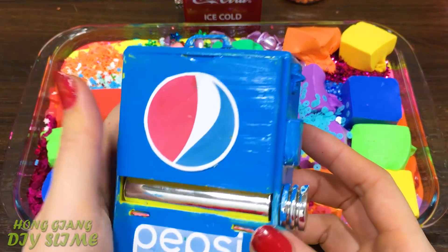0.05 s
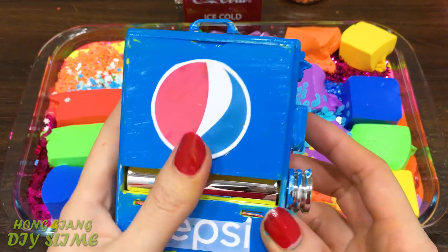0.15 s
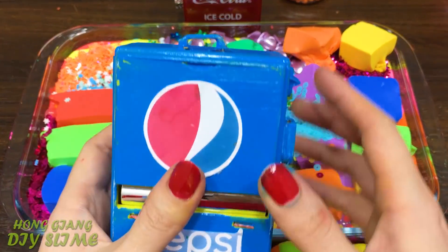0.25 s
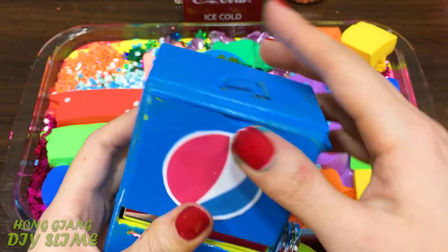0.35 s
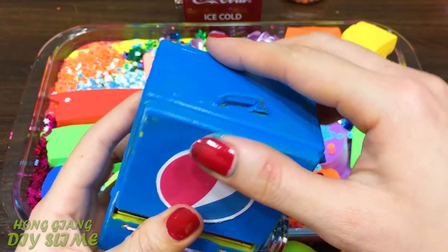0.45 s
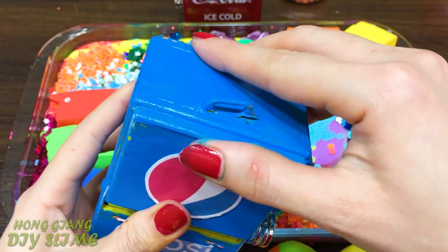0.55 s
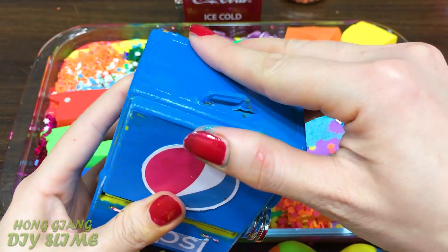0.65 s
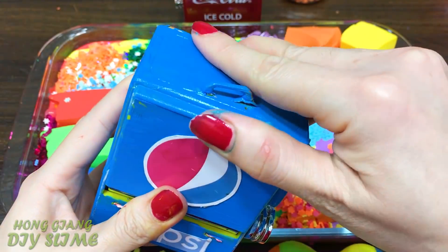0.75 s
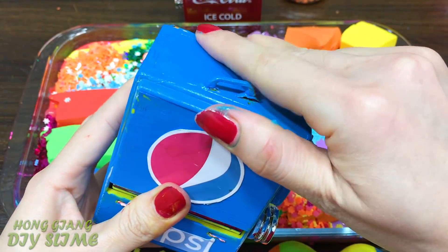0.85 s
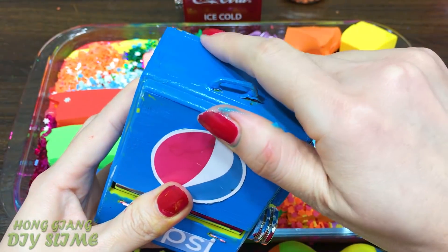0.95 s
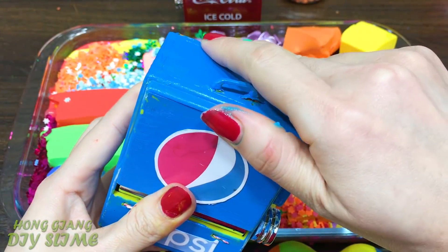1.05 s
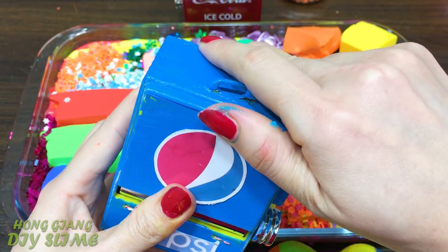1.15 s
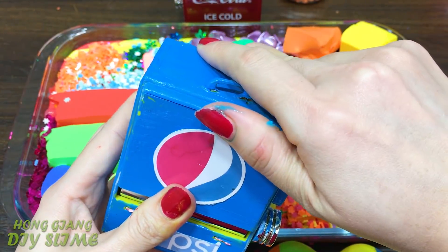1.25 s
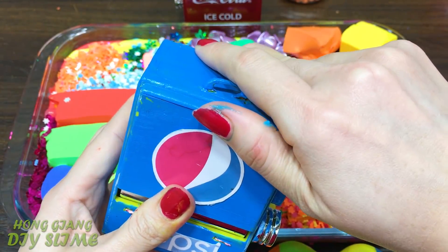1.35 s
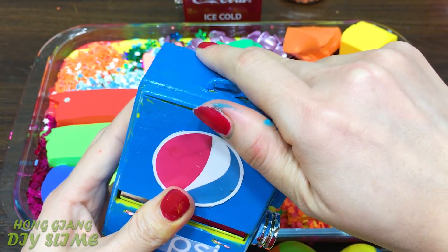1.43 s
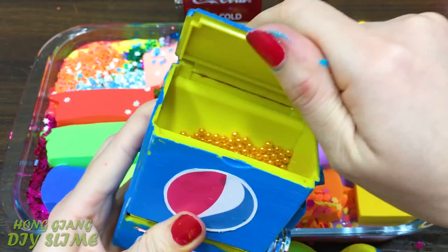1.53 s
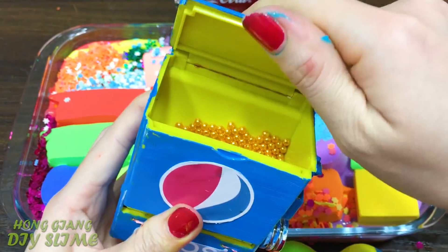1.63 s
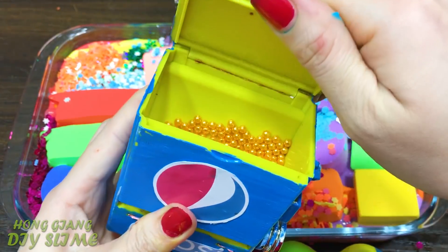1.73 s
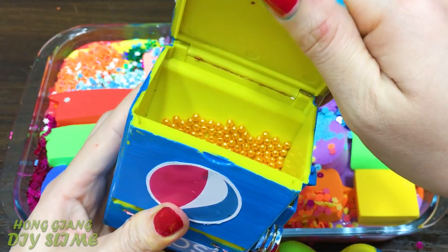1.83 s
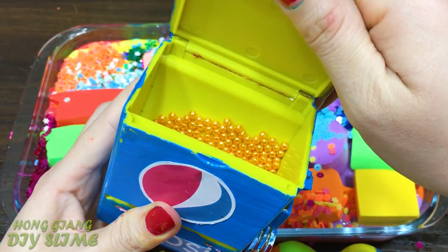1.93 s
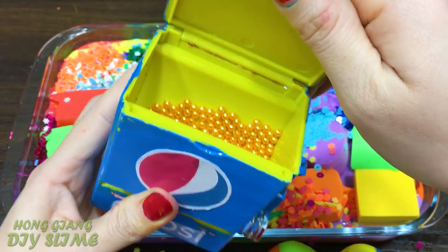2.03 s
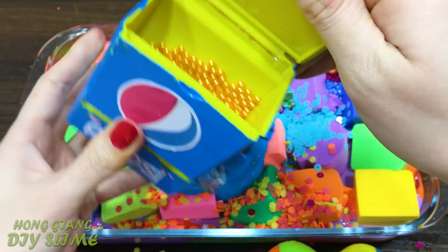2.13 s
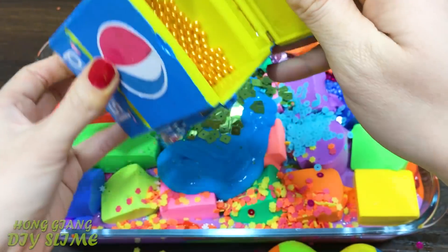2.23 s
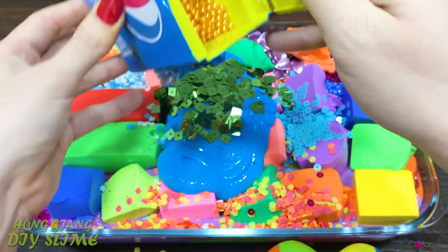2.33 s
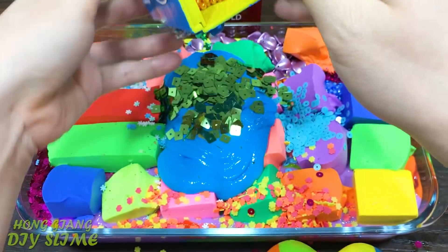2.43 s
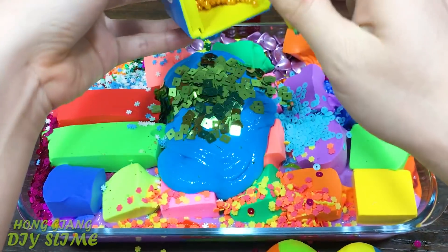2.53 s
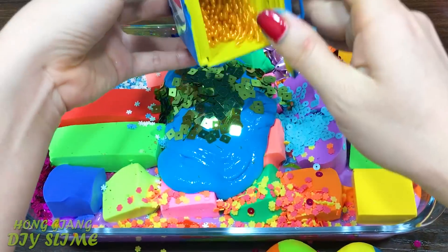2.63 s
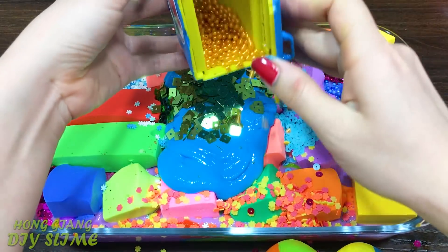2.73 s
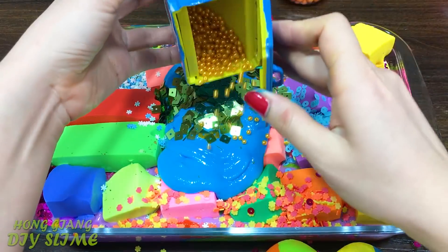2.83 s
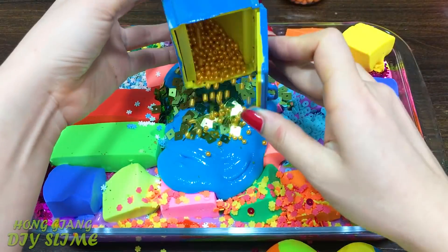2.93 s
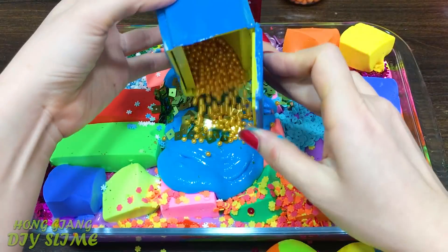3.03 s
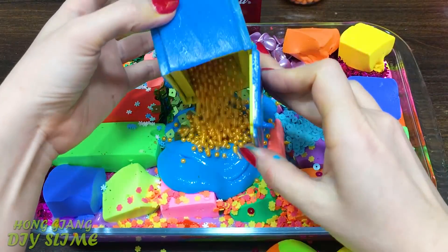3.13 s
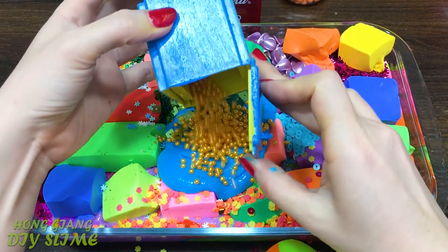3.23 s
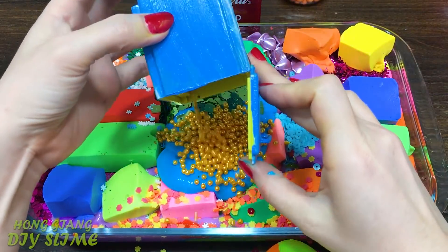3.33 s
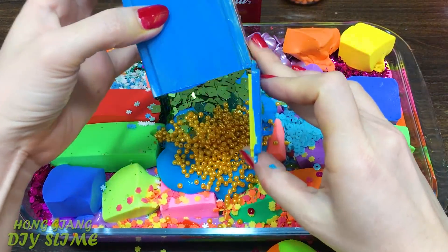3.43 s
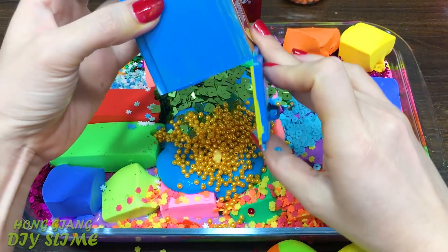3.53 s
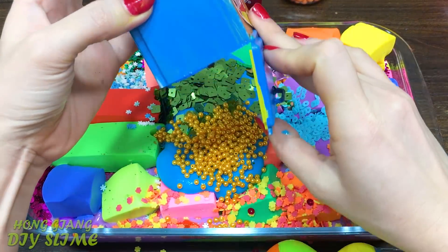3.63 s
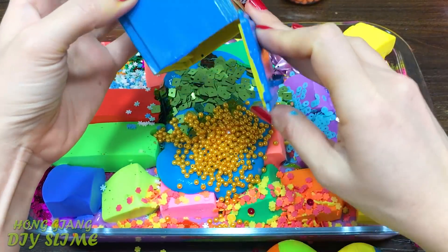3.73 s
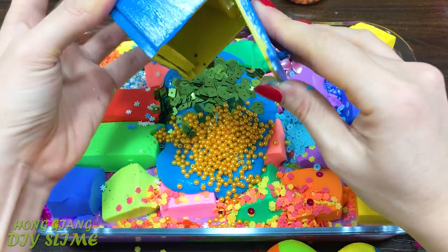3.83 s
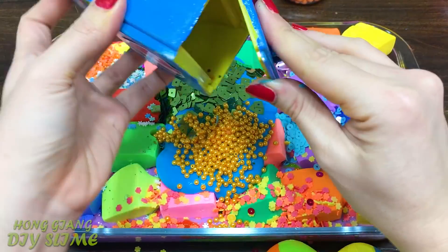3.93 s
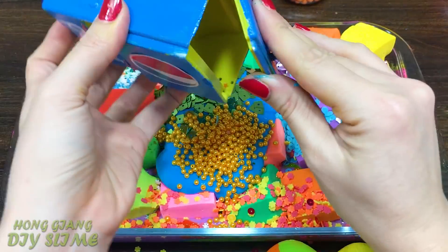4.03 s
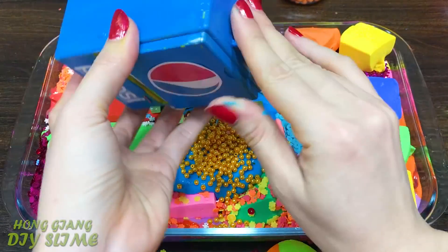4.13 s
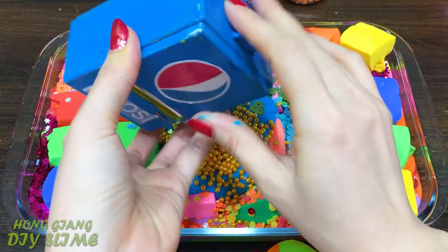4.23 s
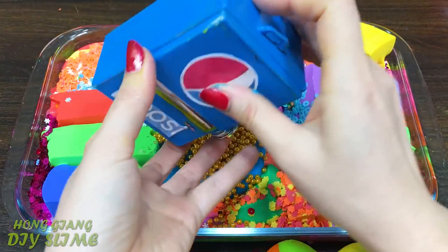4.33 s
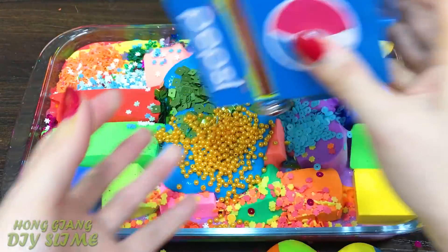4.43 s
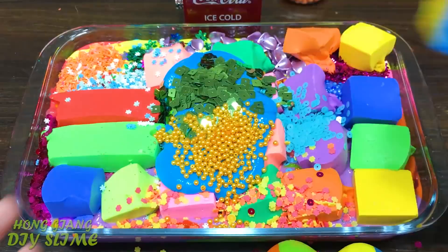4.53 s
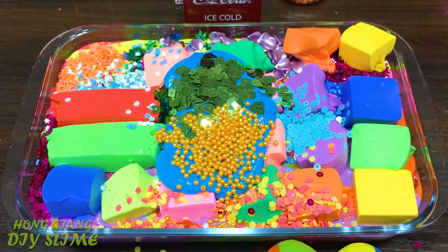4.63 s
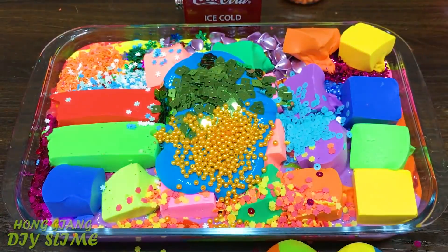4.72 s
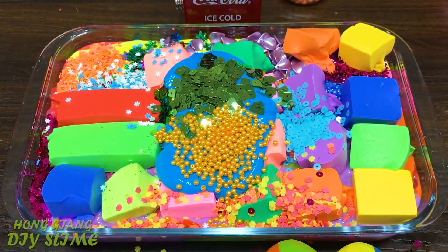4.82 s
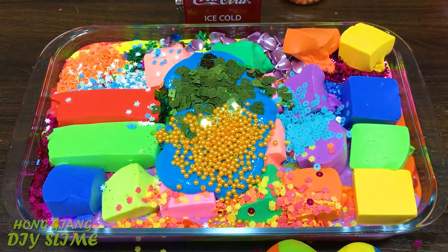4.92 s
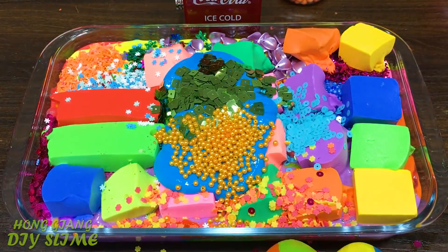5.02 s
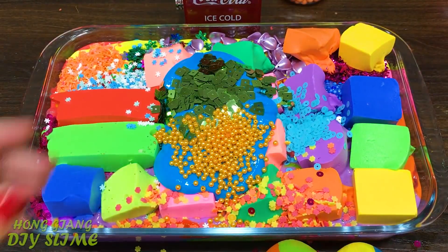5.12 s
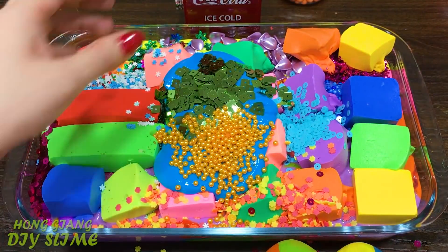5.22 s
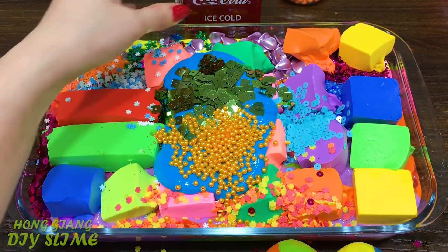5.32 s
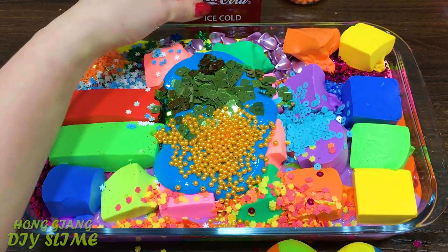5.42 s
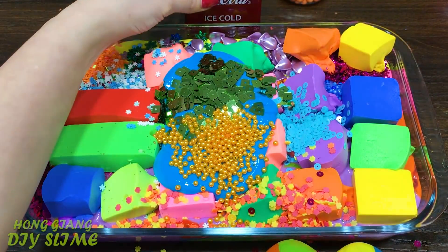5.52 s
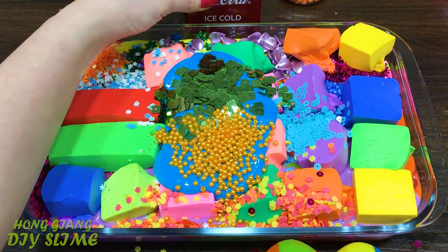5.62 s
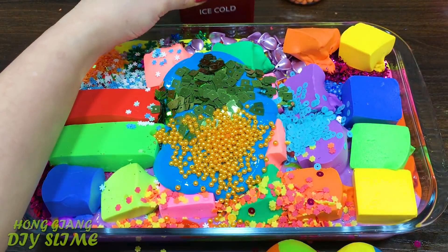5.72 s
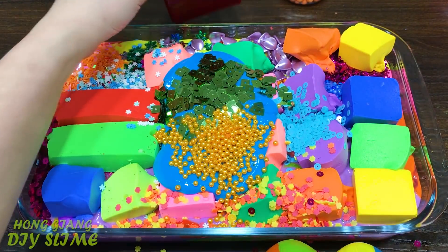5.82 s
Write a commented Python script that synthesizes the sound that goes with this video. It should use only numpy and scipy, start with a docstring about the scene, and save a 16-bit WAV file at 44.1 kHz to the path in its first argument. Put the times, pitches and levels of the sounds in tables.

```python
"""First small beads rattle in a closed plastic box, close by in a quiet room with a faint hum.
The lid creaks open and snaps back, the beads pour onto soft slime, and the empty box is set down hard.
The beads are dense random puffs of noise, coloured by the ringing walls and the air in the hollow.
Ticks and bumps are dying noise; the hinge and the blows add waves that bend through the plastic,
and the blows also add ringing notes and a thud."""
import sys
import numpy as np
from scipy import signal
from scipy.fft import rfft, irfft
from scipy.io import wavfile
from scipy.ndimage import uniform_filter1d

SR = 44100
rng = np.random.default_rng(int(sys.argv[2]) if len(sys.argv) > 2 else 0)


def store_wav(level_fs):
    """Save 16-bit WAV to argv[1]."""
    pcm = np.round(np.clip(np.atleast_2d(level_fs), -1, 1) * 32767)
    wavfile.write(sys.argv[1], SR, pcm.T.astype(np.int16))


N = 258867
TIME = np.arange(N) / SR  # s, for the whole scene
AGE = np.arange(2 ** 14) / SR  # s since a single short sound began
HZ = np.fft.rfftfreq(len(AGE), 1 / SR)


def amp(db):
    """Turns decibels into a gain."""
    return 10 ** (np.asarray(db) / 20)


def unit(x):
    """Scales a signal to rms 1."""
    return x / np.sqrt(np.mean(x ** 2) + 1e-20)


def read(points, hz):
    """Reads between the points of a table, with frequency on a log axis."""
    f, value = np.transpose(points)
    return np.interp(np.log(hz + 1), np.log(f + 1), value)


def add(mix, s, sound):
    """Mixes a sound in at time s."""
    part = mix[max(round(s * SR), 0):][:len(sound)]
    part += sound[:len(part)]


def fade(t, t60):
    """Dies away exponentially, by 60 dB in t60 seconds."""
    return np.exp(-np.log(1000) * t / t60)


def impulse(gain_db):
    """Makes a click of energy 1 with the given spectrum shape and nothing before its start."""
    cepstrum = irfft(np.log(amp(gain_db)))
    half = len(cepstrum) // 2
    # folding the cepstrum forward gives the minimum-phase click
    cepstrum[1:half] *= 2
    cepstrum[half + 1:] = 0
    h = irfft(np.exp(rfft(cepstrum)))
    return h / np.linalg.norm(h)


def colour(x, gain_db):
    """Filters x to the given spectrum shape."""
    return signal.oaconvolve(x, impulse(gain_db))[:len(x)]


def hump(hz, width):
    """Gain of one resonance: 1 at its pitch, less on both sides."""
    return 1 / np.hypot(1, (HZ ** 2 - hz ** 2) / ((HZ + 1) * width))


def mode_db(modes):
    """Peaks in dB that a table of resonances adds to a spectrum."""
    return sum(db * hump(hz, width) ** 2 for hz, width, db in modes)


def octaves():
    """Octaves above 1 kHz."""
    return np.log2((HZ + 1) / 1000)


def burst(t60):
    """A dying puff of noise."""
    return rng.standard_normal(len(AGE)) * fade(AGE, t60)


def reflect(x, t60, wet_db):
    """Adds a short, smeared tail of reflections."""
    tail = burst(t60)
    return x + amp(wet_db) * signal.oaconvolve(x, tail / np.linalg.norm(tail))[:len(x)]


def bending(lag_s):
    """Bending waves in a thin wall: 1 kHz takes lag_s to arrive, lower tones longer."""
    return np.exp(-4j * np.pi * lag_s * np.sqrt(1000 * HZ))


def follow(curve, column):
    """Reads a level curve over time, with -100 dB outside it."""
    points = np.array(curve)
    return np.interp(TIME, points[:, 0], points[:, column], left=-100, right=-100)


def swell_db(s, hold_s, rise_s, fall_s, crest=0):
    """Rises, holds and falls in straight dB lines (60 dB in rise_s or fall_s); crest rounds the top."""
    before = np.maximum((s - TIME) / rise_s, 0)
    after = np.maximum((TIME - s - hold_s) / fall_s, 0)
    away = before + after
    return np.maximum(-60 * (np.hypot(away, crest) - crest), -100)


def slides_db(slides):
    """Level of a series of slides: each swells to a rounded peak and dies away."""
    crest = .055  # share of the swell and decay times over which the peak rounds off
    return np.max([db + swell_db(s, 0, rise_s, fall_s, crest) for s, db, rise_s, fall_s in slides], axis=0)


def collisions(level_db, per_s, spread_db, contact_t60, linger_db):
    """Random bead hits, evened out to a mean power near 1; a louder flow makes them denser."""
    rate = per_s * amp(.6 * (level_db + 28)) + 50
    size = amp(spread_db * np.minimum(rng.exponential(1, N), 4))
    power = (rng.random(N) < rate / SR) * size ** 2
    # each contact is a sharp tick, then a weaker shimmer of the walls
    decay = fade(AGE, contact_t60) ** 2 + (amp(linger_db) * fade(AGE, .06)) ** 2
    power = abs(signal.oaconvolve(power, decay)[:N])
    power /= abs(uniform_filter1d(power, size=1800)) + 1e-6
    return np.sqrt(power) * rng.standard_normal(N)


def shifting(x, depth_db):
    """Colour changes from contact to contact, and drifts as the heap moves along the walls."""
    z = signal.stft(x, nperseg=256)[2]
    quick, slow = rng.standard_normal((2, *z.shape))
    # quick changes are broad in pitch; slow ones are narrow and last longer
    quick = unit(uniform_filter1d(uniform_filter1d(quick, size=14, axis=0), size=2, axis=1))
    slow = unit(uniform_filter1d(uniform_filter1d(slow, size=2, axis=0), size=40, axis=1))
    return unit(signal.istft(z * amp(depth_db * (quick + slow)), nperseg=256)[1][:N])


# the heap slides across the shut box at each tilt:
# peak t/s, level/dB (before the final trim), swell by 60 dB t/s, decay by 60 dB t/s
# (a negative swell time keeps the level steady before the peak and quickens the decay)
SHUT_SLIDES = [(0.0, -38.5, .1, 0.1266), (0.06, -48.5, -0.1, 0.3172), (0.188, -58, -0.24, 0.22),
               (0.345, -32, 0.1149, 0.2745), (0.625, -60, 0.3, 0.31), (0.79, -61.5, 1, .5),
               (0.997, -24.5, 0.16, 0.3616)]
# tone of beads in the shut box: f/Hz, relative level/dB
SHUT_TONE = [(290, -37), (700, -25.5), (1100, -12.5), (1450, -10), (2200, -17), (3000, -6.5), (4200, -11),
             (5000, -2.5), (5900, -8), (7500, -3.5), (9200, -3), (13000, -2.5), (16000, -6)]
# resonances of the shut box: f/Hz, width f/Hz, boost level/dB
SHUT_MODES = [(1416, 129, 7), (2980, 137, 1), (3790.4, 160, 7), (4712, 144, -1.5), (4848, 160, 8),
              (5390, 100, 3.5), (5870, 450, 9.5), (6850, 220, 5.5), (8145, 200, 2.5), (9080, 210, 5),
              (9457, 200, 4.5)]


def shaken_beads():
    """Beads slide across the shut box and ring its walls and air."""
    level_db = slides_db(SHUT_SLIDES)
    hits = collisions(level_db, per_s=2400, spread_db=2.2, contact_t60=.008, linger_db=-14)
    hits = shifting(hits, depth_db=1) * amp(level_db)
    body_db = read(SHUT_TONE, HZ) + mode_db(SHUT_MODES)
    # once the box is tipped, the heap runs over a wall that rings near 5 kHz
    tipped = np.interp(TIME, [.6, .9], [0, 1])
    tipped_db = body_db + 5 * hump(5000, 440) ** 2 + 4 * hump(3050, 267) ** 2
    upright_sound = (1 - tipped) * colour(hits, body_db)
    tipped_sound = tipped * colour(hits, tipped_db)
    return amp(-1.0) * (upright_sound + tipped_sound)


# spells of a faint low hum: start t/s, length t/s, level/dB, pitch f/Hz
HUM = [(0, 0.98, -66.5, 140), (2.45, 0.744, -69.5, 201.8), (3.95, .6, -67.5, 135.1)]
# tone of the quiet room: f/Hz, relative level/dB
ROOM_TONE = [(15, -58.5), (25, -35.5), (70, -1), (145, -10.5), (175, -9.5), (301, -13.5), (624, -22),
             (754, -22), (1610, -27), (2350, -27), (3720, -29.5), (14800, -34), (16000, -49.5)]


def room_tone():
    """Low rumble and faint hiss from coloured noise; the hum is a tone with a slow random strength."""
    fade_s = 2.4  # time for the hum to swell or die by 60 dB
    hum = np.zeros(N)
    for s, length, db, hz in HUM:
        slow_db = -40 * np.log10(1 + (HZ / 25) ** 2).clip(0, 2.5)
        waver = colour(rng.standard_normal(N), slow_db)
        tone = unit(waver * np.sin(2 * np.pi * hz * TIME))
        hum += amp(db + swell_db(s, length, fade_s, fade_s)) * tone
    return hum + amp(-63) * colour(rng.standard_normal(N), read(ROOM_TONE, HZ))


# the clearest single beads and fingernails ticking on plastic:
# t/s, peak level/dB (before the final trim), lows against highs level/dB
TICKS = [(0.0024, -29, -4.5), (0.046, -21, -11.5), (0.0626, -23, -7.5), (0.2898, -26, -3.5),
         (0.3336, -25.5, 9), (0.3934, -20, -2), (0.4513, -27.5, 4), (0.5144, -28.5, 4), (1.1079, -19.5, 13),
         (1.1943, -21, 14), (1.2144, -17.5, 24), (1.3154, -12.5, 7.5), (1.8584, -27.5, 2),
         (2.574, -30.5, -11.5), (2.6229, -30, -9.5), (2.6728, -25.5, -2), (2.7037, -28, 0.5),
         (2.9245, -26, 7), (2.9656, -24, 10.5), (4.336, -31, 5), (4.2221, -35, 14), (4.4462, -35.5, 11),
         (4.8595, -24.5, -18), (4.8802, -29, -21.5), (5.0608, -27, -5), (5.0796, -22.5, -2.5),
         (5.086, -23, -5)]
# tone of a tick: f/Hz, relative level/dB
TICK_TONE = [(300, -33.5), (1000, -10), (2000, -17), (4000, -7), (6000, -3), (9000, 1.5), (12000, -3.5),
             (16000, -4.5)]


def ticks():
    """Tiny hard contacts with a brief shimmer of the plastic."""
    out = np.zeros(N)
    for s, db, lows_db in TICKS + stray_ticks():
        contact = burst(0.0052) + amp(-19.5) * burst(0.051)
        tick = colour(contact, read(TICK_TONE, HZ) + lows_db / (1 + (HZ / 4000) ** 2))
        add(out, s, amp(db) * tick / abs(tick).max())
    return amp(-2.0) * out


# stretches in which stray beads tick at random:
# start t/s, end t/s, rough number of ticks per second, typical peak level/dB (before the ticks' trim)
STRAYS = [(0.07, 0.21, 20.7, -37), (0.575, 0.64, 44.1, -34), (1.46, 1.83, 15.8, -41),
          (4.15, 4.32, 26, -41.5), (4.921, 5.08, 28, -38)]


def stray_ticks():
    """Rows of random ticks, scattered over each stretch, for the tick player."""
    strength_spread_db, lows_spread_db = 1.5, 9.5  # how far they differ in strength and in colour
    rows = []
    for start, end, per_s, db in STRAYS:
        gap, strength, lows = rng.uniform(-1.1, 1, size=(3, 40))
        times = start + np.cumsum(1 + gap) / per_s
        found = zip(times, db + strength_spread_db * strength, lows_spread_db * lows)
        rows += [row for row in found if row[0] < end]
    return rows


# light bumps of the box: t/s, peak level/dB (before the final trim), pitch f/Hz
BUMPS = [(0.745, -39.5, 1360), (2.444, -39, 2281), (2.455, -36.5, 2230), (2.641, -34.5, 1920),
         (3.44, -20.5, 1395), (3.443, -17.5, 2820), (4.335, -37, 1883), (4.895, -37.5, 1270),
         (4.94, -24, 1254), (4.962, -33, 1297), (4.996, -33.5, 1320)]


def bumps():
    """Soft, heavily damped knocks of the handled box."""
    out = np.zeros(N)
    for s, db, hz in BUMPS:
        knock = burst(0.0102) + amp(-15) * burst(0.069)
        bump = colour(knock, 28 * np.log10(hump(hz, 382) + 0.039))
        add(out, s, amp(db) * bump / abs(bump).max())
    return amp(-5.0) * out


# slips of the stiff hinge: t/s, peak level/dB
SLIPS = [(1.1493, -20.5), (1.1863, -26), (1.1985, -34), (1.2140, -24), (1.3015, -31), (1.3145, -31),
         (1.3275, -29.5), (1.4450, -30), (1.5752, -26), (1.6053, -28.5), (1.6685, -24.5), (1.7257, -25.5),
         (1.8425, -24), (1.9255, -27.5), (1.9685, -31), (2.0035, -28)]
# tone of a slip: f/Hz, relative level/dB
SLIP_TONE = [(120, -41), (200, -26.5), (487, 1), (843, -5), (1230, 3), (1590, -3.5), (1890, -14.5),
             (4010, -22), (5740, -34.5), (6260, -45.5), (12000, -49.5), (15600, -86), (22000, -120)]


def hinge():
    """Each slip sends a bending wave through the lid: highs arrive first, so it chirps down."""
    # harder slips are brighter: dB per octave for each dB above the plain peak
    tilt, plain_db = .25, -28
    out = np.zeros(N)
    # tiny creeping slips fall between the large ones
    creep = [(1.15 + .85 * u, -54 + 11 * v) for u, v in rng.random((34, 2))]
    for s, db in SLIPS + creep:
        bright_db = max(tilt * (db - plain_db), -1)
        # every slip starts at another spot of the hinge and has its own notches
        uneven_db = 1.5 * np.interp(HZ, np.linspace(0, SR / 2, num=70), rng.standard_normal(size=70))
        click = impulse(read(SLIP_TONE, HZ) + bright_db * octaves() + uneven_db)
        slip = irfft(rfft(click) * bending(lag_s=0.0014))
        add(out, s, amp(db) * slip / abs(slip).max())
    return reflect(out, t60=0.12, wet_db=-17.0)


# strokes of plastic rubbing, at the hinge and then over the table:
# start t/s, length t/s, grit level/dB, shell ring level/dB (both before the final trim)
RUBS = [(1.467, 0.296, -66, -62.5), (1.85, .13, -74.5, -65.5), (4.8, 0.092, -49.5, -58.5),
        (4.95, 0.14, -51, -59), (5.753, .015, -63, -75)]


def rubbing():
    """Faint grainy scraping of plastic with a thin ring of the shell."""
    attack_s, release_s = .05, .2  # time to swell and to die by 60 dB
    strokes = []
    for s, length, *dbs in RUBS:
        strokes.append(np.add.outer(dbs, swell_db(s, length, attack_s, release_s)))
    grit_db, ring_db = np.max(strokes, axis=0)
    hits = collisions(grit_db, per_s=500, spread_db=3.5, contact_t60=.007, linger_db=-15)
    shell_db = 30 * np.log10(hump(2620, 420) + 1.25 * hump(1500, 450) + 1e-3)
    grit = colour(hits * amp(grit_db), read(TICK_TONE, HZ))
    ring = colour(hits * amp(ring_db), shell_db)
    return amp(-2.5) * (grit + ring)


# blows on the shell, from the lid, the hand and the table: t/s, crack level/dB,
# brightness in dB per octave, wall note level/dB, ring level/dB, thud level/dB (gains of each part)
BLOWS = [(2.0211, -8, -1, -24.5, -33.5, -57), (2.06, -2.5, -0.2337, -6, -17, -43),
         (2.638, -54.5, -5.5, -56.5, -47.5, -87.5), (4.3349, -38, 3, -58, -56, -70),
         (4.6643, -39.5, 0.5, -54.5, -56, -67), (4.6749, -30.5, -2.5, -31.5, -35, -51.5),
         (4.6828, -3.5, 0.21, -12, -17, -22.5)]
# tones of the crack, the ringing shell and the thud: f/Hz, relative level/dB
CRACK_TONE = [(60, -25.5), (200, -17), (400, -0.5), (600, 6.5), (800, -2), (980, -16.5), (1350, 0.5),
              (1800, -9), (2200, -4.5), (4000, -9), (8000, -11.5), (16000, -16.5)]
SHELL_TONE = [(100, -23), (300, -2.5), (600, -4), (980, -16.5), (1400, 3), (2000, -4), (2800, -5),
              (5000, -9.5), (8000, -6), (16000, -12.5)]
THUD_TONE = [(20, -30), (50, -14), (130, -5.5), (180, -11), (240, -6), (350, 2.5), (450, -6.5), (590, -1.5),
             (720, -12.5), (1100, -26.5), (4000, -48.5)]
# resonances of the open shell: f/Hz, width f/Hz, boost level/dB
OPEN_MODES = [(387, 17, 2), (500, 35, 2.5), (594.6, 35, 6), (725.5, 51, 7), (1281, 65, 4.5),
              (1520, 46, 4.5), (1630, 60, 4), (2085, 55, 5), (2590, 73, 5), (2900, 57, 2.5), (3275, 110, 4),
              (4022, 120, 6.5)]
# how long the plastic shell rings: f/Hz, decay by 60 dB t/s
SHELL_T60 = [(300, 0.24), (1000, 0.077), (2700, .23), (8000, 0.21), (16000, .17)]
# short notes of the struck wall: f/Hz, relative level/dB, decay by 60 dB t/s
WALL_NOTES = [(1339, -0.5, .028), (1413.6, -9, 0.042), (2063, -6, 0.028), (2540, -10, 0.021)]


def blows():
    """A bending wave with brief chatter, the wall's note, the ring of the shell, and a low thud."""
    out = np.zeros(N)
    for s, crack_db, bright_db, wall_db, ring_db, thud_db in BLOWS:
        chatter = rng.choice([-1., 1.], len(AGE)) * np.exp(-(AGE / 0.0033) ** 2)
        # the chatter is mostly treble; the push carries the lows
        chatter = signal.lfilter(*signal.butter(3, 1300, "high", fs=SR), chatter)
        push = irfft(bending(lag_s=.0009))
        contact = amp(13.0) * push + amp(-3) * chatter
        crack = colour(contact, read(CRACK_TONE, HZ) + bright_db * octaves())
        # noise in which each pitch dies at its own pace
        hz, t, z = signal.stft(rng.standard_normal(len(AGE)), SR, nperseg=256)
        dying = z * fade(t, read(SHELL_T60, hz)[:, None])
        shell = signal.istft(dying, SR, nperseg=256)[1][:len(AGE)]
        ring = colour(shell, read(SHELL_TONE, HZ) + mode_db(OPEN_MODES))
        thud = colour(burst(0.26) + amp(3) * burst(.025), read(THUD_TONE, HZ) + mode_db(OPEN_MODES))
        wall = sum(amp(db) * fade(AGE, t60) * np.cos(2 * np.pi * f * AGE) for f, db, t60 in WALL_NOTES)
        struck = amp(crack_db) * crack + amp(wall_db) * wall
        add(out, s, struck + amp(ring_db) * ring + amp(thud_db) * thud)
    return out


# tone of beads in the full open box: f/Hz, relative level/dB
OPEN_TONE = [(300, -41.5), (600, -29), (1000, -23.5), (1300, -11.5), (2000, -9), (2500, -5), (3200, -7),
             (4100, -4.5), (5300, -7.5), (7000, -4), (8500, -1), (10000, -3.5), (12000, -0.5),
             (16000, -3.5)]


def jolted_beads(s=2.069, db=-20):
    """The heap jumps when the lid snaps back and lands a moment later."""
    age = np.maximum(TIME - s, 0)
    level = amp(db) * np.minimum(age / 0.0044, 1) * fade(age, 0.27)
    hits = collisions(np.full(N, db), per_s=810, spread_db=1.5, contact_t60=.007, linger_db=-14.5)
    ringing_db = 4 * hump(7700, 600) ** 2 + 10 * hump(2120, 160) ** 2
    rattle = colour(hits * level, read(OPEN_TONE, HZ) + ringing_db)
    # the first landing knocks the floor of the box
    landing = np.zeros(N)
    knock = np.sin(2 * np.pi * 1620 * AGE) * np.minimum(AGE / 0.0034, 1) * fade(AGE, 0.031)
    add(landing, 2.0745, amp(-24) * knock)
    return rattle + landing


# small slides in the open box, before and after the pour:
# peak t/s, level/dB, swell by 60 dB t/s, decay by 60 dB t/s
OPEN_SLIDES = [(2.646, -43, 0.0289, 0.1162), (2.712, -51.5, 0.0022, .19), (2.926, -49, 0.0969, 0.18),
               (4.123, -42, 0.1565, 0.225), (4.215, -58, 0.41, 0.82)]
# the main stream of beads: t/s, flow level/dB, hollow's ring level/dB (both before their trims)
POUR = [(2.95, -50.5, -54.5), (3.148, -27.5, -42.5), (3.266, -24.5, -47), (3.374, -28.5, -41),
        (3.56, -29, -41.5), (3.74, -26.5, -36.5), (3.874, -34, -38.5), (4.0, -54, -70.5),
        (4.08, -64.5, -67.5)]
# tone of beads on the bare walls: f/Hz, relative level/dB
BARE_TONE = [(300, -44.5), (600, -31.5), (1100, -24), (1500, -13), (1900, -19.5), (2450, -8.5), (3100, -4),
             (4200, -6), (5600, -6), (7500, -2.5), (9500, -1.5), (11800, 2), (13300, -4), (16000, 1.5)]
# resonances of the nearly empty box: f/Hz, width f/Hz, boost level/dB
BARE_MODES = [(2934, 330, 0.5), (3210, 370, 2.5), (4020.3, 300, 9.5), (4822, 250, 9), (6670, 150, 5.5),
              (8550, 490, 2.5), (11070, 300, 4.5)]


def poured_beads():
    """Beads slide and roll out of the open box, whose hollow rings more as it empties."""
    flow_db, hollow_db = follow(POUR, column=1), follow(POUR, column=2)
    slide_db = slides_db(OPEN_SLIDES)
    level_db = np.maximum(flow_db, slide_db)
    hits = collisions(level_db, per_s=2000, spread_db=2.75, contact_t60=.009, linger_db=-15)
    hits = shifting(hits, depth_db=1.4)
    # the full heap fizzes brightly; later the bare walls ring
    emptied = np.interp(TIME, [3.28, 3.55], [0, 1])
    stream = amp(1.5) * amp(flow_db)
    full_level = (1 - emptied) * stream + amp(slide_db)
    full = colour(hits * full_level, read(OPEN_TONE, HZ) + 4 * hump(8500, 800) ** 2)
    bare = colour(hits * emptied * stream, read(BARE_TONE, HZ) + mode_db(BARE_MODES))
    # the air in the hollow rings in one narrow band
    air_db = 30 * np.log10(hump(2070, 160) + hump(2190, 160) + 1e-4)
    build_up = amp(-3 * (1 - emptied) - 0.49)
    # small slides ring the hollow 15 dB below their own level
    ring_level = build_up * amp(hollow_db) + amp(slide_db - 15)
    ring = colour(hits * ring_level, air_db)
    return full + bare + ring


def scene():
    """All sources, close and nearly dry."""
    beads = shaken_beads() + jolted_beads() + poured_beads() + ticks()
    box = hinge() + rubbing() + bumps() + blows()
    heard = reflect(beads + box, t60=.18, wet_db=-18)
    # the box and beads are muted abruptly here; only the room tone is heard for half a second
    mute_s = 5.091
    unmuted = (TIME < mute_s) | (TIME > mute_s + .5)
    return (heard * unmuted + room_tone())[None]


def record(dry):
    """The hardest blows overload the input and flatten; then the top treble is cut off."""
    edge_hz = 15950
    low_pass = signal.firwin(511, edge_hz, window=("kaiser", 9), fs=SR)
    return signal.oaconvolve(np.clip(dry, -1, 1), low_pass[None], "same")


dry = scene()
out = record(dry)
store_wav(out)
```